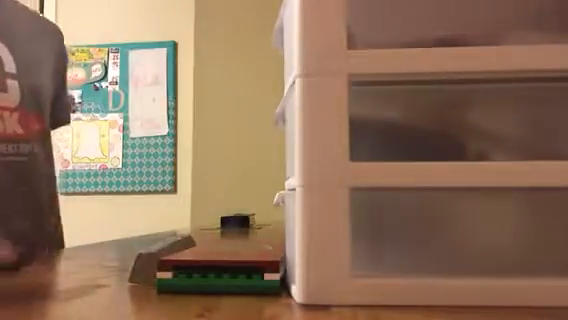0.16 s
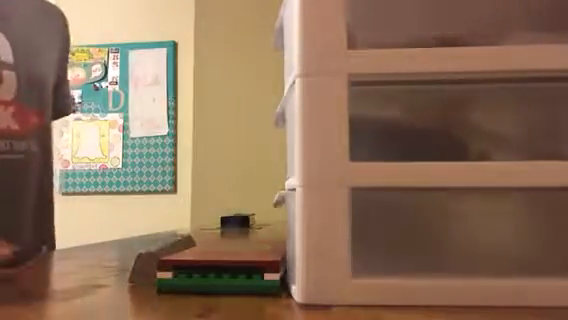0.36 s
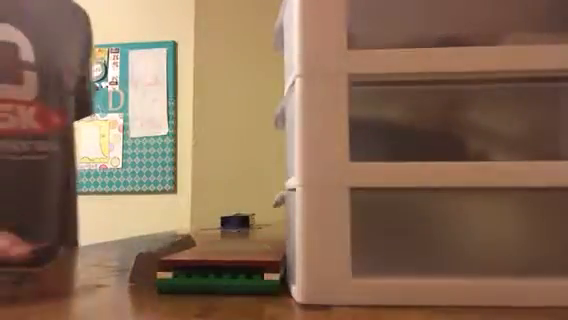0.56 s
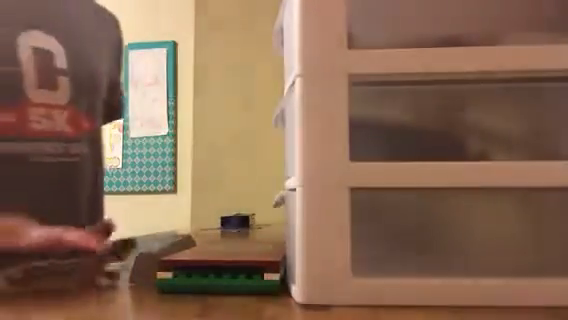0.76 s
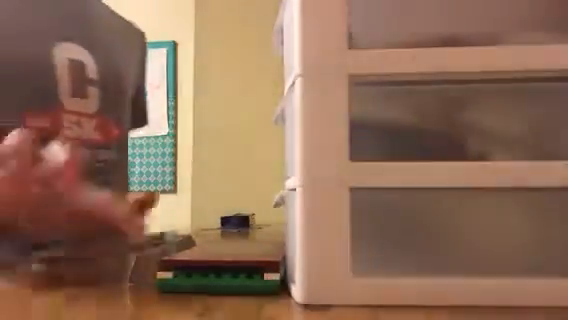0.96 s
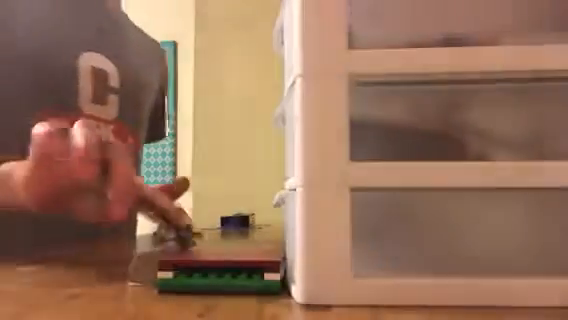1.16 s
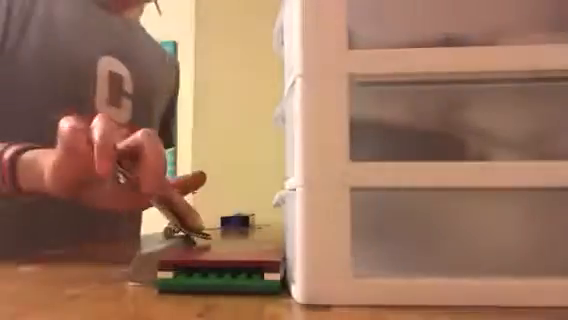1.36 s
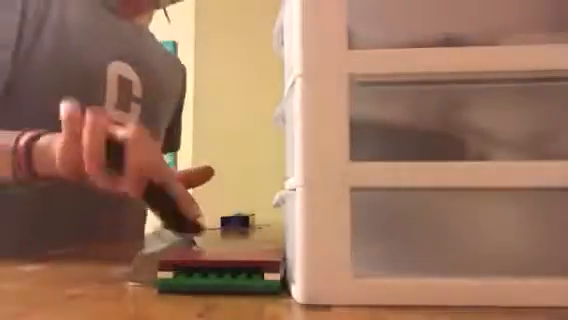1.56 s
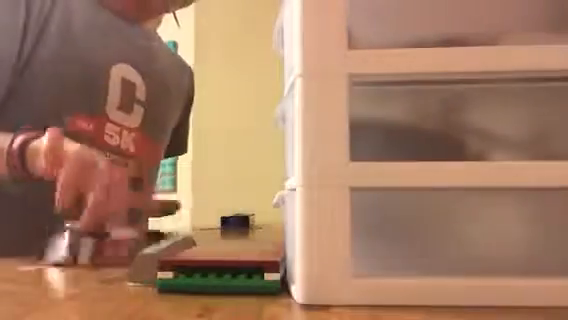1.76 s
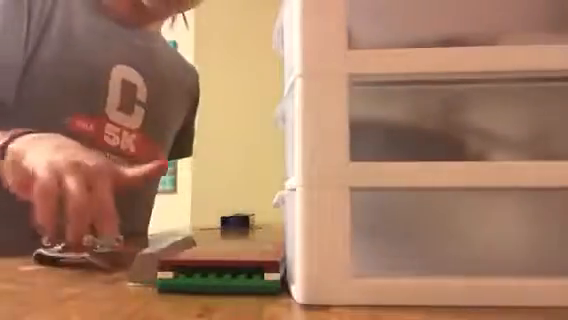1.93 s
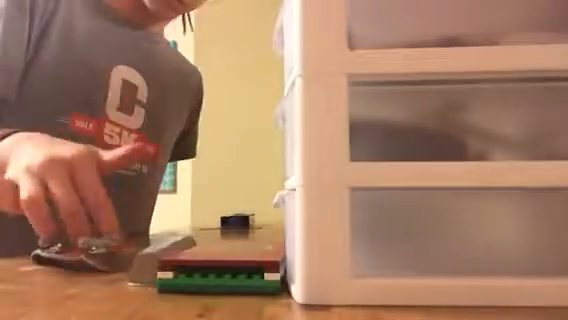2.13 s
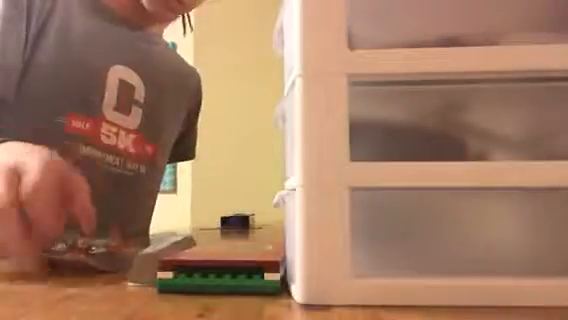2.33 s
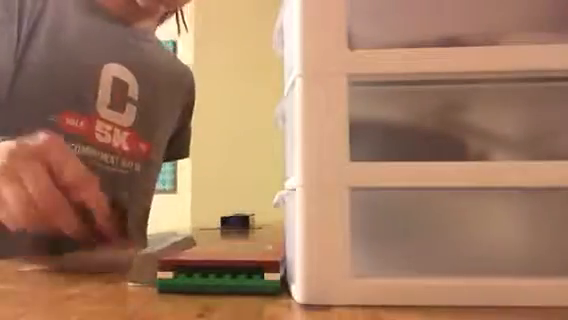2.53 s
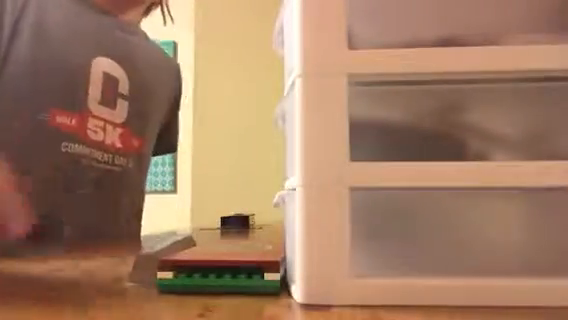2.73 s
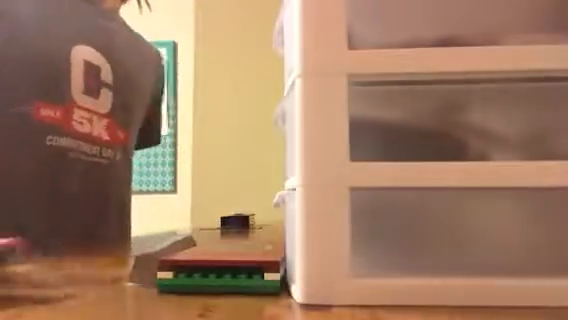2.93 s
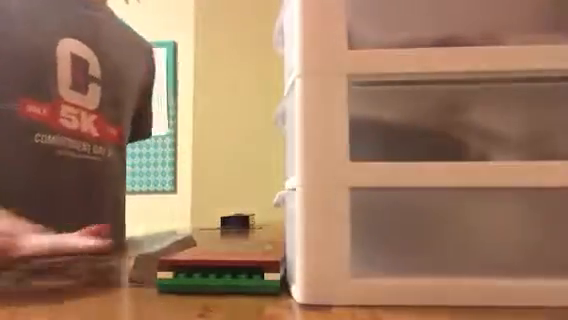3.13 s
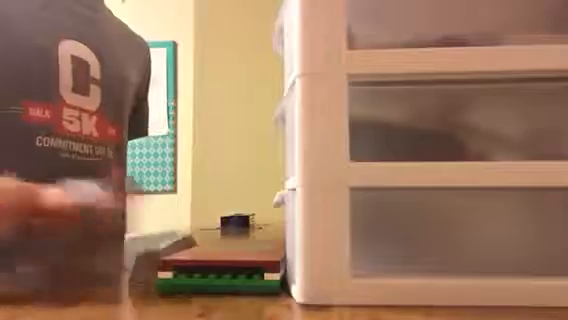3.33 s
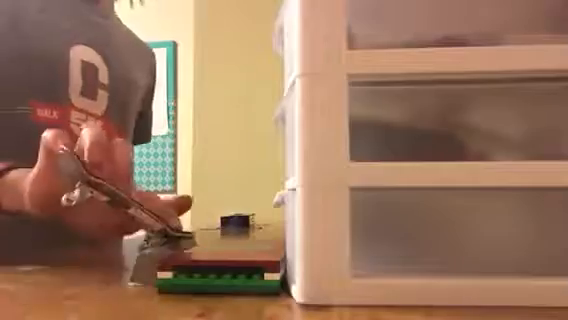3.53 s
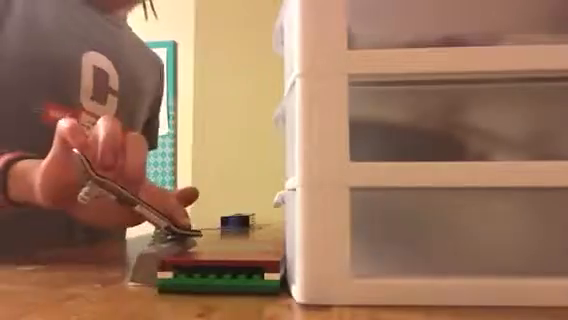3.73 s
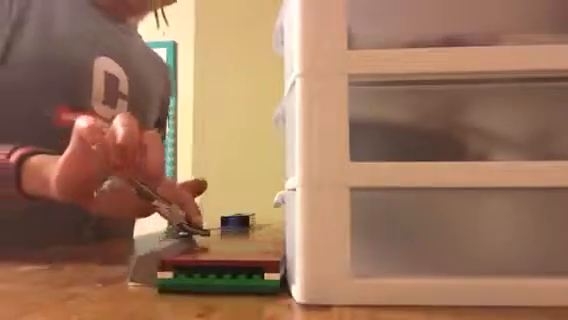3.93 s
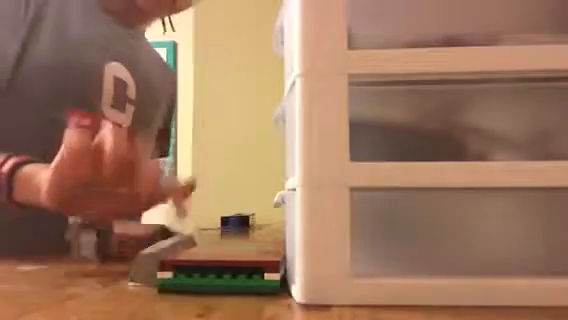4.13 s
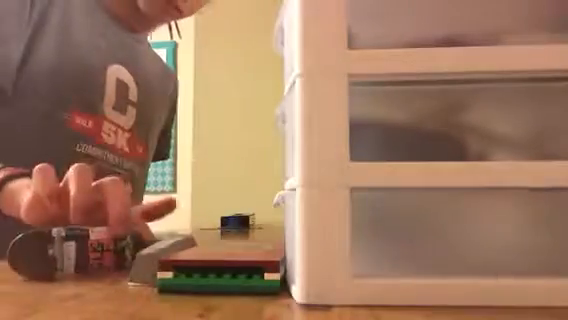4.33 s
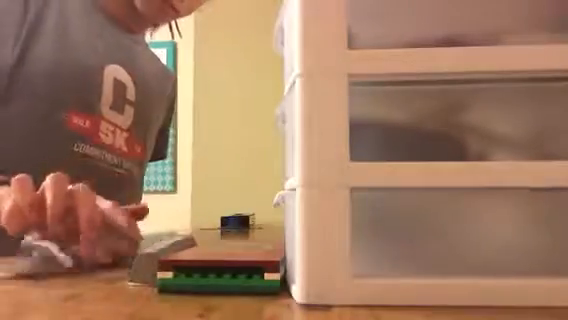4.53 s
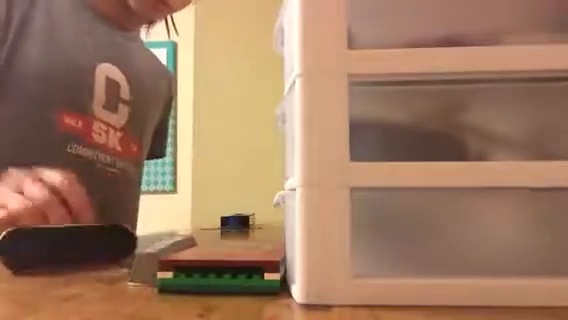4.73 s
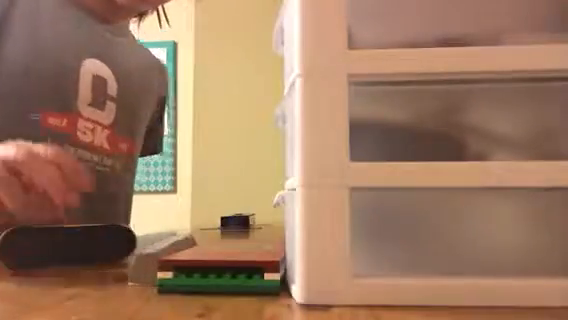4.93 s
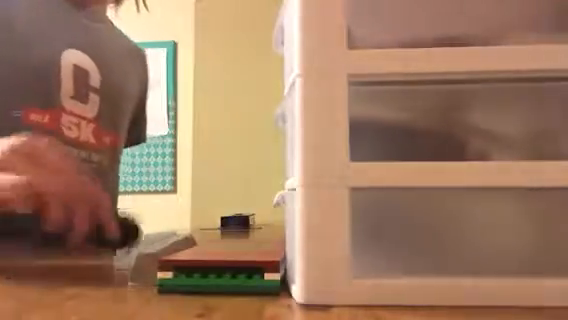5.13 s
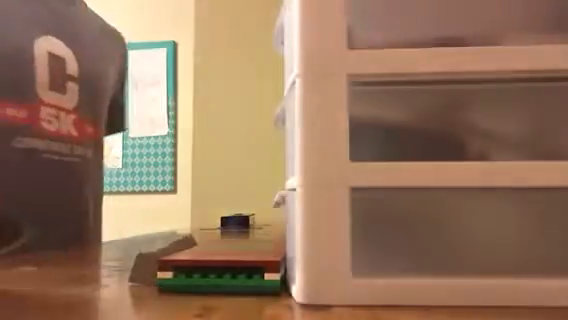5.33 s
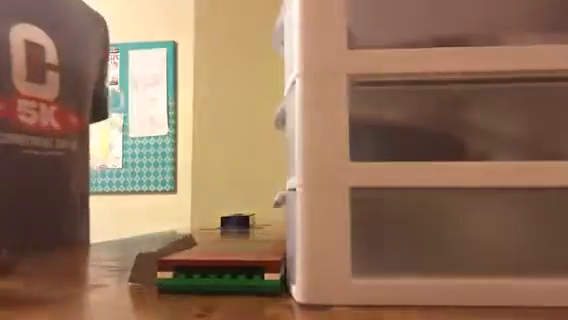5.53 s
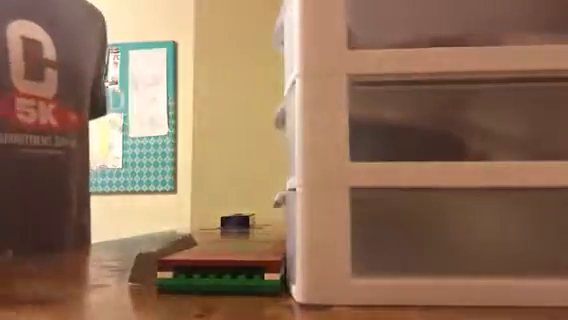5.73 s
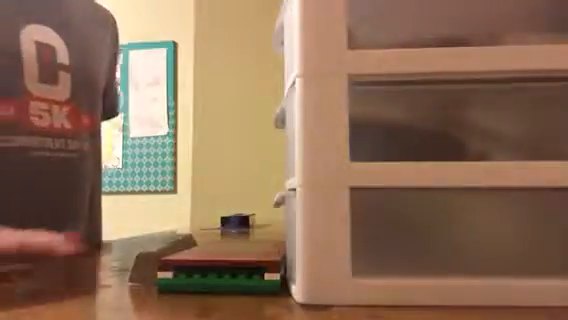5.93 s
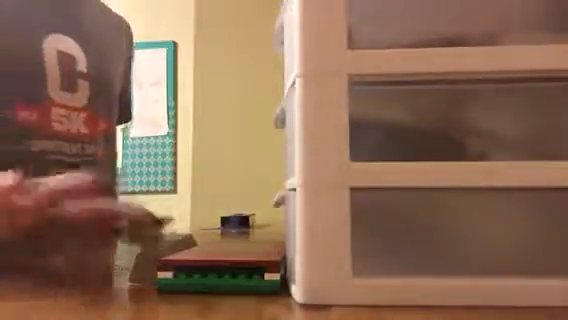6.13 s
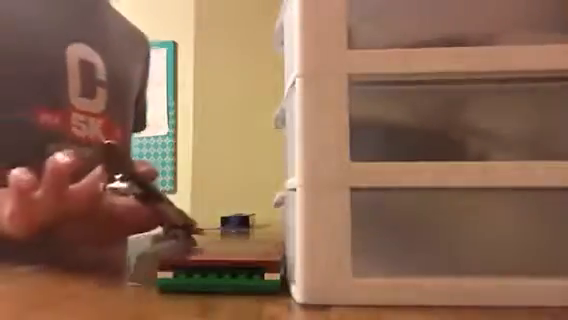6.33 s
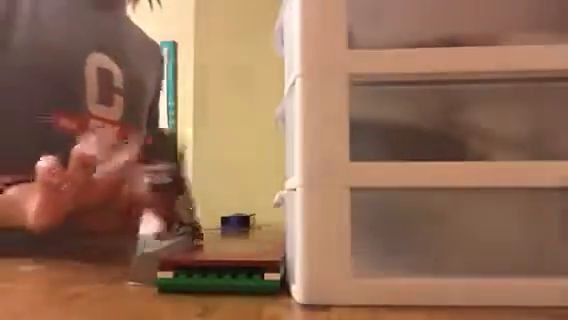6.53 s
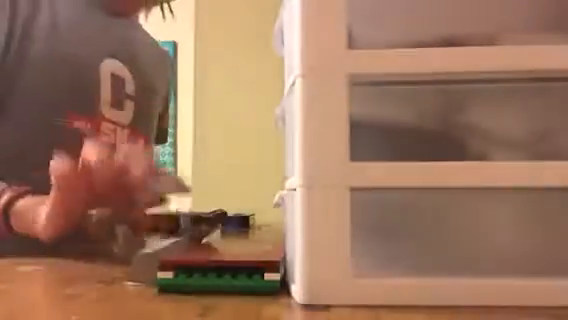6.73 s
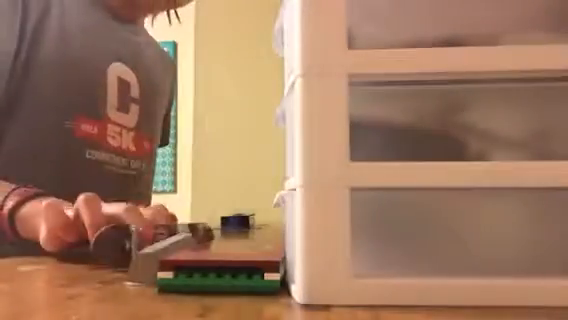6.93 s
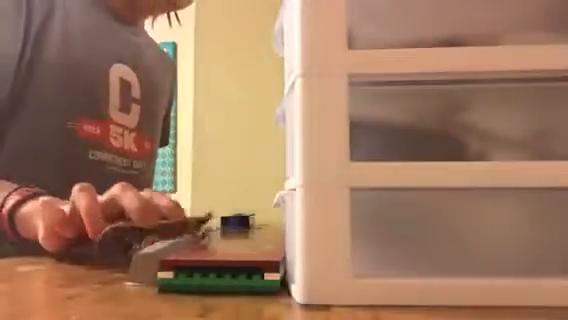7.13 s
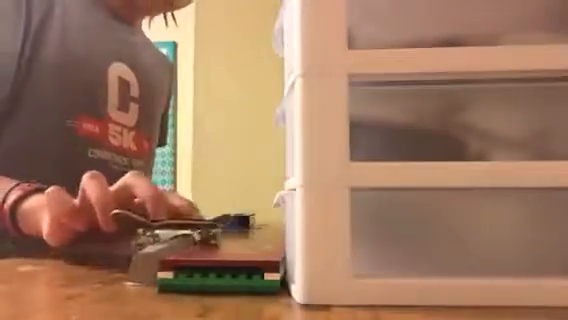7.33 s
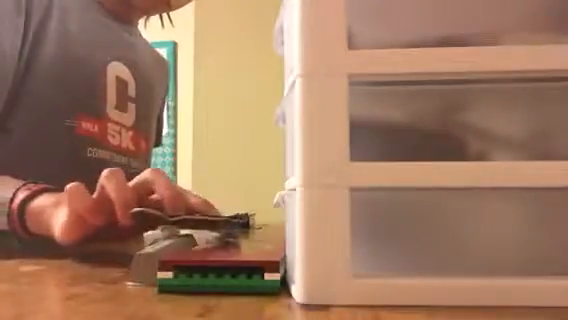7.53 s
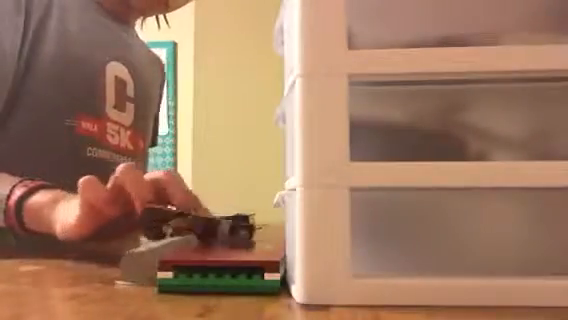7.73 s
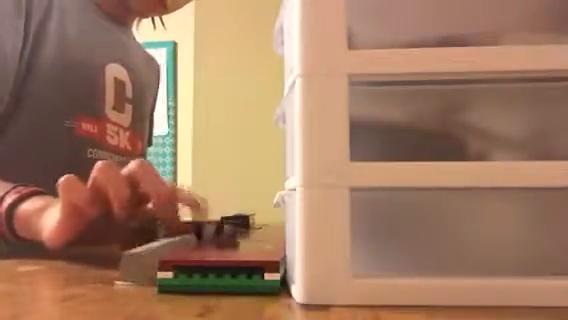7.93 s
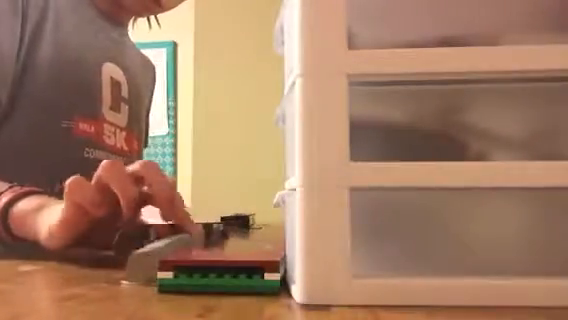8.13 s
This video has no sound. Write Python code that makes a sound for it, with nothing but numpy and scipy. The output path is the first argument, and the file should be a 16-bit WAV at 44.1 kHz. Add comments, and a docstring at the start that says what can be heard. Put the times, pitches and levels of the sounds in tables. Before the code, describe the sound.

Over faint room hiss, a finger skateboard makes bright, hard clicks with woody knocks and low desk thuds. Short gritty rolls lead into ramp hits and low pressing rumble; two drops to the desk are loudest. Quiet fumbling separates the attempts, and the last breaks into a fast run of knocks, thinning to light taps. Recorded very near, with short room reverberation.

```python
"""Over a faint steady room noise one first hears a clack, then a finger-sized skateboard rolled over a wooden desk,
popped onto a small plastic ramp and dropped again, close to a phone lying on the desk.
Impact: short bursts and soft pushes excite resonances of axles, wheels, deck, desk and the hollow below.
Friction: slowly wavering noise drives the same bodies as the board rolls, rubs and scrapes along the ramp edge.
Reverberation: decaying noise tails stand for a small furnished room."""
import sys
import numpy as np
from scipy import signal
from scipy.fft import rfft, irfft, next_fast_len
from scipy.io import wavfile
from scipy.ndimage import map_coordinates

SR = 44100
rng = np.random.default_rng(int(sys.argv[2]) if len(sys.argv) > 2 else 0)


def unload_wav(signal):
    """Save mono or channel-first audio to the path in sys.argv[1] as 16-bit WAV at rate SR, clipped to [-1, 1]."""
    wavfile.write(
        sys.argv[1],
        SR,
        np.round(np.clip(np.atleast_2d(signal).T, -1, 1) * 32767).astype(np.int16),
    )


N = 365148

# Room tone and microphone hiss, spectral shape: f/Hz, relative density level/dB
QUIET_SPECTRUM = [(15, -48), (25, -1.5), (108, 3.5), (363, -4.5), (427, -6), (962, -9.5), (1290, -10.5),
                  (2760, -15), (3080, -16), (4610, -16.5), (10400, -23.5), (13600, -27.5), (16000, -28.5)]
# Reverberation of the furnished room: f/Hz, time to fall 60 dB/s
ROOM_DECAY = [(100, 0.26), (300, 0.27), (1000, 0.17), (4000, 0.2), (12000, 0.2)]

# Resonances of each body: f/Hz, width/Hz, relative level/dB of one pass through the resonance
HOLLOW_MODES = [(97.4, 51, 1), (110, 23, -9), (145.9, 23, -1.5), (208, 83, -7)]  # space under ramp and desk
DESK_MODES = [(235, 28, -5), (299.9, 45, -0.5), (357, 94, -5.5)]  # desk top
DECK_MODES = [(548, 34, -4), (662, 100, -7), (930, 120, -2), (1090, 120, 2.5), (1141, 210, -0.5),
              (1324, 240, -8)]  # board
AXLE_MODES = [(1536, 210, 0.5), (1583, 520, -0.5), (1898, 180, 1), (2320, 250, -3.5), (2550, 78, -1),
              (2955, 460, -4.5)]
WHEEL_MODES = [(3516, 460, 3), (4500, 1100, -1), (5940, 1100, -2.5)]
ROLL_MODES = [(511, 49, -0.5), (850, 110, 3), (1130, 180, -4), (2000, 610, -17), (3550, 1300, -23),
              (6255, 3000, -27.5), (12400, 5800, -36.5)]  # board on its wheels
RAMP_MODES = [(1213, 70, -2), (2040, 350, -3), (3560, 900, -1.5), (6150, 990, -3), (9100, 500, -9.5),
              (12700, 5100, -21)]  # scraped ramp edge
# Sharp tick of a contact, spectral shape: f/Hz, relative level/dB
TICK_SPECTRUM = [(3000, -32), (6000, 3.5), (8000, 1), (10500, -7), (13000, -6.5), (16000, -12.5)]

# Strokes of each motion: start t/s, rise/s, hold/s, fall/s, level/dB
LEAN_STROKES = [(.51, 0.075, 0.046, 0.19, -51.5), (1.03, .03, 0.16, 0.091, -44.5),
                (1.27, 0.075, 0.2, 0.079, -41.5), (3.52, 0.01, 0.018, .1, -35.5),
                (3.66, 0.068, 0.23, .05, -45), (3.9, 0.074, .07, 0.095, -39.5),
                (4.59, 0.088, .01, .07, -45), (5.09, 0.035, 0.022, 0.078, -39),
                (6.25, 0.024, 0.27, 0.044, -39), (6.47, 0.094, 0.024, .14, -32),
                (7.52, 0.04, 0.13, .05, -47.5), (7.84, 0.049, 0.015, 0.035, -49),
                (8.22, 0.062, 0.018, .02, -46)]  # board pressed on the ramp
RUB_STROKES = [(.52, 0.026, 0.013, 0.11, -42.5), (1.04, 0.014, 0.017, 0.056, -45),
               (2.06, 0.02, 0.017, 0.096, -43.5), (2.21, 0.015, 0.0087, 0.038, -55),
               (3.67, 0.017, 0.04, 0.2, -60), (3.92, 0.082, 0.026, 0.08, -50),
               (4.56, 0.04, 0.042, 0.034, -50.5), (4.76, 0.033, 0.011, 0.051, -51),
               (6.25, 0.023, .03, 0.37, -53), (8.23, 0.021, .03, .02, -51)]  # fingers on the desk
ROLL_STROKES = [(.3, 0.08, 0.011, 0.13, -54), (.6, 0.12, 0.14, 0.24, -48), (2.97, 0.12, 0.17, 0.048, -41),
                (3.285, 0.013, 0.021, 0.093, -39), (5.84, 0.14, 0.044, 0.13, -38),
                (3.93, 0.071, 0.046, .06, -54), (6.42, 0.047, 0.028, 0.02, -51.5),
                (6.52, .025, 0.0092, 0.058, -54.5), (7.53, 0.034, 0.0092, 0.034, -46.5),
                (7.86, 0.041, 0.0086, .03, -57.5)]  # wheels turning
SCRAPE_STROKES = [(1.04, 0.0067, 0.11, 0.085, -45.5), (1.2, 0.058, 0.086, .03, -79),
                  (1.3, 0.05, .12, 0.11, -64), (1.56, 0.027, .03, 0.13, -65), (2.03, .02, 0.044, 0.3, -71),
                  (3.67, 0.018, 0.054, 0.21, -64.5), (3.88, 0.059, .12, .06, -59),
                  (6.25, 0.023, 0.055, 0.084, -49.5), (6.37, 0.052, .22, 0.055, -59),
                  (7.53, 0.022, 0.0088, .04, -50), (7.58, 0.1, .04, .03, -57),
                  (7.85, 0.012, 0.072, 0.027, -58), (8.24, 0.036, .02, .02, -52.5)]  # axles on the ramp edge
FUMBLE_STROKES = [(2.42, 0.024, 0.027, 0.11, -59), (4.14, .015, 0.039, .02, -54),
                  (4.61, 0.028, 0.043, 0.026, -61), (4.74, 0.033, 0.024, 0.038, -50.5),
                  (5.07, 0.041, .02, .04, -60), (5.13, 0.018, 0.026, 0.054, -48),
                  (6.4, 0.051, 0.027, 0.033, -61.5), (7.57, 0.049, .08, .03, -58.5)]  # fingers fumbling the board

# Contacts: t/s, direct axle clack peak level/dB, then levels/dB relative to the clack, before the part gains below:
# weight on the desk, deck knock, wheel snap, tick
CONTACTS = [(0.1548, -32.5, -26, -11, -8.5, -9), (0.184, -25.5, -13, -5, -0.5, -1),
            (0.2791, -20, -14.5, -15, -18, -18), (0.358, -48.5, -12, -16, -21, -4),
            (0.5337, -60, 19.5, 13, -19, -26), (0.85, -31.5, -10.5, -10, -10.5, -12.5),
            (0.8964, -48, -20, 5.5, -3.5, -6.5), (0.9971, -19.5, -7, -7, -7, -3.5),
            (1.0383, -24, -10, -4.5, -14.5, -1), (1.1537, -50.5, -3, 1, 3, 12), (1.1758, -46, -6, -8, 1, 5),
            (1.424, -58, 6.5, 7.5, 9, -13), (1.5934, -58, 7.5, -9.5, 2, 10),
            (1.7135, -47.5, -8, -21.5, -5.5, -20.5), (1.7826, -12.5, -12.5, -2.5, -8, -7.5),
            (1.8202, -4, -22.5, -16.5, -8, -18.5), (2.0189, -23.5, -2, -5, 5, -7),
            (2.1847, -67.5, -5, -10, 14, 3), (2.2291, -59.5, -3, -13, 6, -20),
            (2.4225, -42.5, 10, 8.5, -25, -26), (2.4393, -40.5, 5, -9, -7, -8),
            (2.4961, -53, 9.5, 6, 2.5, 1.5), (2.58, -70.5, -1, -11, 5, 13),
            (2.8397, -19, -21.5, -15.5, -8, -8), (2.8572, -18.5, -12, 0.5, -5, -8),
            (3.4446, -21.5, -5, -18, -6.5, -1), (3.4981, -18.5, -16.5, -29, -7.5, -11),
            (3.6906, -55, 9, -13, -5, 3.5), (3.8188, -65, 12, -9, 10.5, 17), (3.9816, -46, 11, -2.5, -7, 0),
            (4.1999, -5, -16, -5.5, -5.5, -16), (4.3091, -13.5, -19, -4.5, -4, -21.5),
            (4.6595, -55.5, 8, 1, 6.5, -9.5), (4.6838, -50.5, 6, -2, -2, -4),
            (4.7726, -42, -32, -18, 1.5, -28), (4.791, -37.5, -15, -6, -5.5, -21),
            (5.064, -37.5, -14, -6, -11.5, -28.5), (5.0891, -45, -3.5, 5, -18, -20),
            (5.151, -35.5, -12.5, 0.5, -4.5, -7.5), (5.1944, -55, -12.5, -14.5, 8.5, 1),
            (5.5159, -37, -24.5, -20.5, 0, -9), (5.5732, -40, -3.5, 6.5, -10, -3.5),
            (5.606, -61, -6, 13, 1, 7), (5.6774, -20.5, -8, -10.5, -6.5, -9),
            (6.0771, -42, -12, 5, -4.5, -12), (6.2099, -21, -8.5, -29, 2.5, -6.5),
            (6.2383, -20.5, -3.5, -11.5, 3, -4.5), (6.286, -33, -13, -19, -3, -26),
            (6.5572, -60, 28, 11, 8, -11), (6.6697, -56.5, -7, -10, 6, 9),
            (6.7316, -29, -1.5, 1.5, -0.5, 0), (6.764, -12, -8.5, -3.5, -3.5, -4),
            (6.8832, -29.5, -3, -2, -5, -1), (6.8962, -32, -11, -10, 5, 6.5),
            (6.9274, -17.5, -15, -5, -15, -22), (6.9419, -28, -11.5, -19, -10, -12),
            (6.9841, -19, -19, -6.5, -18, -34), (7.0028, -15, -18, -8, -12, -38),
            (7.0421, -19.5, -15, -4, -14, -39), (7.0666, -27, -13, -12, -21, -31.5),
            (7.1814, -39, -6, -18, -5, -1), (7.1931, -37.5, -9.5, -11, 1, 6.5),
            (7.2783, -33, -21.5, -9.5, 5, 4.5), (7.2981, -28, -30, -24, -26, -29),
            (7.471, -38, -13.5, -30, 8, -5.5), (7.5639, -27.5, -20.5, -23, -5.5, -26.5),
            (7.6171, -46.5, -18, -12, -10, -10), (7.65, -45.5, -22, -9, -17, -9),
            (7.7066, -33.5, -6.5, -12, 2.5, 2.5), (7.7368, -23.5, -14, -16, -5, -5.5),
            (7.9263, -26.5, -10, -6.5, -9, -9), (8.0513, -15, -18.5, -5.5, -26, -33),
            (8.2504, -34, -20, -10, -17, -30), (8.2704, -36, -7.5, -17, -7.5, -5.5)]
# A first wheel or edge touching just before a landing: t/s, direct axle peak level/dB
TOUCHES = [(0.2728, -34.5), (0.9829, -31), (1.769, -40.5), (3.4249, -27.5), (4.151, -45), (4.188, -16),
           (6.1991, -28.5), (7.548, -47), (7.6954, -30), (8.0388, -46)]
# Weight, knock, snap and tick of every touch: relative levels/dB, before the part gains below
TOUCH_COLOUR = [-11, -10, -9, -11]

QUIET_DB = -69.5  # rms level of the room tone before the microphone's band limits
TOP_HZ = 16000  # band limit of the microphone
FADE_DB = 31  # a stroke rises from and falls to this far under its level
ROLL_RUBS_DB, ROLL_PRESSES_DB, ROLL_HISSES_DB, LEAN_RUBS_DB = -7, -13, -25, -18.5  # one motion stirring other parts
BOOM_DB, THUMP_DB, KNOCK_DB, SNAP_DB, TICK_DB = 2.5, 2, 1.5, 5, 5  # part gains: how strongly each part answers
CHATTER_S = 0.015  # time for the chatter of a contact to fall 60 dB


def amp(db):
    """Level: a gain is ten to the power of dB over twenty."""
    return 10 ** (np.asarray(db) / 20)


def unit(x):
    """Normalisation: the signal is scaled to rms 1."""
    return x / np.sqrt(np.mean(x ** 2, axis=-1, keepdims=True) + 1e-20)


def along(points, hz):
    """Interpolation: values between (f/Hz, value) points follow a logarithmic frequency axis."""
    f, values = np.transpose(points)
    return np.interp(np.log(hz + 1), np.log(f + 1), values)


def wobble(rate):
    """Slow fluctuation: a smooth random curve of `rate` knots a second, bounded to -1..1."""
    knots = rng.standard_normal(int(N * rate / SR) + 4)
    return np.tanh(map_coordinates(knots, [np.arange(N) * rate / SR]))


def filtered(x, response):
    """Linear filtering: the spectrum is multiplied by a complex response, along the last axis."""
    n = x.shape[-1]
    padded = next_fast_len(n + 8192)  # room for the ringing, so that it does not wrap round
    spectrum = rfft(x, padded) * response(np.fft.rfftfreq(padded, 1 / SR))
    return irfft(spectrum, padded)[..., :n]


def modes(table, scatter_db=0):
    """Resonance: damped modes of alternating sign add up; scatter_db (rows, modes) shifts their levels row by row."""
    shift = np.atleast_2d(scatter_db) + np.zeros(len(table))

    def response(f):
        total = 0
        for k, (centre, width, db) in enumerate(table):
            resonance = 1j * f * width / (centre * centre - f * f + 1j * f * width)
            total = total + (-1) ** k * amp(db + shift[:, k:k + 1]) * resonance
        return total

    return response


def soft(response, top_hz):
    """Contact compliance: a yielding contact feeds little above top_hz."""
    return lambda f: response(f) / (1 + 1j * f / top_hz) ** 2


def tails(count, size):
    """Reverberation: noise of energy 1 in which each frequency dies at its own speed."""
    hz, t, cells = signal.stft(rng.standard_normal((count, size)), SR, nperseg=256)
    decay = amp(-60 * t / along(ROOM_DECAY, hz)[:, None])
    tail = signal.istft(cells * decay, SR, nperseg=256)[1][:, :size]
    return unit(tail) / np.sqrt(size)


def grit(rate, spread_db):
    """Friction: a dense hiss with tiny impacts of uneven size, `rate` a second on average."""
    bumps = (rng.random(N) < rate / SR) * amp(spread_db * rng.exponential(size=N))
    return rng.standard_normal(N) * (1 + bumps)


def rattle(rate, t60, spread_db):
    """Random impact: loose parts knock at random moments in short noise bursts of uneven size."""
    starts = (rng.random(N) < rate / SR) * amp(spread_db * rng.standard_normal(N))
    decay = amp(-60 * np.arange(1024) / SR / t60)
    return np.convolve(starts, decay)[:N] * rng.standard_normal(N)


def strokes(rows):
    """Envelope: each stroke's gain rises, holds and falls along straight lines in dB."""
    t = np.arange(N) / SR
    total = 0
    for start, rise, hold, fall, db in rows:
        # 15 ms at either end lead from and to near silence
        corners = start + np.cumsum([-.015, .015, abs(rise), abs(hold), abs(fall), .015])
        levels = db - FADE_DB * np.array([4, 1, 0, 0, 1, 4])
        total = total + amp(np.interp(t, corners, levels))
    return total


def room_tone():
    """Stationary noise: random samples are shaped to a fixed spectrum."""
    noise = rng.standard_normal(N)
    return amp(QUIET_DB) * unit(filtered(noise, lambda f: amp(along(QUIET_SPECTRUM, f))))


def press_sound(catch):
    """Stick-slip: the board pressing the ramp drives the hollow below with wavering noise."""
    force = amp(5.7 * catch + 1.6 * wobble(11)) * rng.standard_normal(N)
    return unit(filtered(force, lambda f: modes(HOLLOW_MODES)(f) ** 2)[0])


def rub_sound(catch):
    """Sliding friction: fingers on the desk drive the desk modes with wavering noise."""
    force = amp(3.5 * catch + 3.7 * wobble(35)) * rng.standard_normal(N)
    return unit(filtered(force, lambda f: modes(DESK_MODES)(f) ** 2)[0])


def roll_sound():
    """Rolling contact: gritty noise under the wheels rings the board and its level wavers."""
    waver = amp(5 * wobble(60) + 2.5 * wobble(14))
    return unit(waver * filtered(grit(400, spread_db=3), modes(ROLL_MODES))[0])


def scratch_force(catch):
    """Stick-slip: wavering grit and a rattle form the force between axles and ramp edge."""
    sliding = amp(3 * catch + 4.5 * wobble(90)) * grit(400, spread_db=3.5)
    return sliding + amp(10) * rattle(80, t60=0.015, spread_db=3)


def scrape_sound(scratch):
    """Moving excitation: each resonance of the edge comes and goes as the contact point wanders."""
    total = 0
    for mode in RAMP_MODES:
        presence = amp(3 * wobble(25))
        total = total + presence * filtered(scratch, lambda f: modes([mode])(f) ** 2.2)[0]
    return unit(total)


def hiss_sound():
    """Broadband friction: wavering grit loses its bass and its highest treble."""
    force = amp(2 * wobble(60)) * grit(600, spread_db=5)
    return unit(filtered(force, soft(lambda f: 1j * f / (1j * f + 1500), top_hz=9200)))


def fumble_sound(hiss):
    """Random impact: the fumbled board rattles its axles and wheels over a little hiss."""
    response = soft(modes(AXLE_MODES + WHEEL_MODES), top_hz=7250)
    knocks = unit(filtered(rattle(120, t60=0.016, spread_db=0), response)[0])
    return knocks + amp(-12) * hiss


def motion():
    """Superposition: pressing, rubbing, rolling, scraping and fumbling add; the last three get a room echo."""
    rolling, leaning, scraping = strokes(ROLL_STROKES), strokes(LEAN_STROKES), strokes(SCRAPE_STROKES)
    pressing = leaning + amp(ROLL_PRESSES_DB) * rolling
    rubbing = strokes(RUB_STROKES) + amp(ROLL_RUBS_DB) * rolling + amp(LEAN_RUBS_DB) * leaning

    catch = wobble(35)  # stick and slip shared by pressure, rub and scrape
    press = press_sound(catch)
    rub = rub_sound(catch)
    roll = roll_sound()
    scratch = scratch_force(catch)
    scrape = scrape_sound(scratch)
    hiss = hiss_sound()
    # a hard scrape also hisses between the resonances
    rasp = amp(-8) * (scraping / amp(-40.5)) ** .5 * hiss
    # the shaken board knocks along
    loose = unit(filtered(scratch, modes(DECK_MODES + AXLE_MODES))[0])
    fumble = fumble_sound(hiss)

    airborne = rolling * (roll + amp(ROLL_HISSES_DB) * hiss + amp(-16.5) * loose)
    airborne = airborne + scraping * (scrape + rasp + amp(-9) * loose)
    airborne = airborne + strokes(FUMBLE_STROKES) * fumble
    echo = signal.fftconvolve(airborne, tails(count=1, size=16384)[0])[:N]
    return pressing * press + rubbing * rub + airborne + amp(-9.5) * echo


def struck(response, force, tail, wet_db):
    """Impulse response: a direct ring of peak 1, and the room, which blends the modes heard from all sides."""
    ring = filtered(force, response)
    ring = ring / np.abs(ring).max(axis=1, keepdims=True)
    ring_rms = np.sqrt(np.mean(ring ** 2, axis=1, keepdims=True))
    # a shuffle of the tails over the contacts
    room = unit(filtered(rng.permutation(tail), lambda f: np.abs(response(f)) ** 0.89))
    return ring + amp(wet_db) * room * ring_rms


def clacks(size=16384):
    """Impact: each contact chatters for a few ms and rings every body at new mode strengths; the room answers each."""
    contacts = [*CONTACTS, *[(*row, *TOUCH_COLOUR) for row in TOUCHES]]
    s, clack_db, weight_db, deck_db, wheel_db, sharp_db = np.transpose(contacts)[:, :, None]
    count = len(contacts)
    t = np.arange(size) / SR
    chatter = amp(-60 * t / CHATTER_S) * (1 - np.exp(-t / 0.0006)) ** 2
    push = np.exp(-t / 0.00039) * t + 0 * s  # the heavy desk feels one soft push
    # the room answers 180 samples (4 ms) late
    tail = np.pad(tails(count, size), ((0, 0), (180, 0)))[:, :size]

    def jolts():
        """Noise burst: fresh chatter for every contact."""
        return chatter * rng.standard_normal((count, size))

    def uneven(table, depth_db):
        """Strike position: the same modes at other strengths for each contact."""
        return modes(table, depth_db * rng.standard_normal((count, len(table))))

    axle = struck(soft(uneven(AXLE_MODES, 4.5), top_hz=3020), jolts(), tail, wet_db=-9)
    snap = struck(soft(uneven(WHEEL_MODES, 6.4), top_hz=6900), jolts(), tail, wet_db=-9)
    knock = struck(soft(uneven(DECK_MODES, 4.2), top_hz=1596), jolts(), tail, wet_db=-4.5)
    sharp_jolts = jolts() * amp(-60 * t / 0.078)
    tick = struck(lambda f: amp(along(TICK_SPECTRUM, f)), sharp_jolts, tail, wet_db=-10)
    thump = struck(uneven(DESK_MODES, 3.9), push, tail, wet_db=-5)
    boom = struck(uneven(HOLLOW_MODES, 5.6), push, tail, wet_db=-2.5)

    heard = axle + amp(wheel_db + SNAP_DB) * snap + amp(deck_db + KNOCK_DB) * knock
    heard = heard + amp(sharp_db + TICK_DB) * tick
    heard = heard + amp(weight_db + THUMP_DB) * thump + amp(weight_db + BOOM_DB) * boom
    heard = amp(clack_db) * heard
    # every contact is added in at its own time
    where = np.round(s * SR).astype(int) + np.arange(size)
    return np.bincount(where.ravel(), heard.ravel(), N + size)[:N]


def scene():
    """Superposition: all sound pressures add at the microphone."""
    return (clacks() + motion() + room_tone())[None]


def record(dry):
    """Band limitation: the phone cuts deep bass and keeps almost nothing above its band limit."""
    def response(f):
        bass_cut = (1j * f / (1j * f + 55)) ** 4
        return bass_cut / (1 + (f / TOP_HZ) ** 80)

    return filtered(dry, response)


dry = scene()
out = record(dry)
unload_wav(out)
```